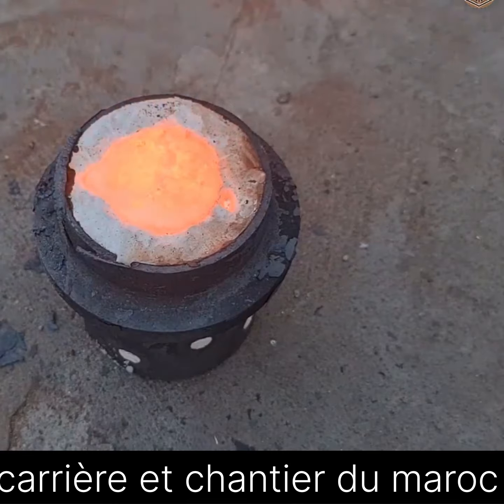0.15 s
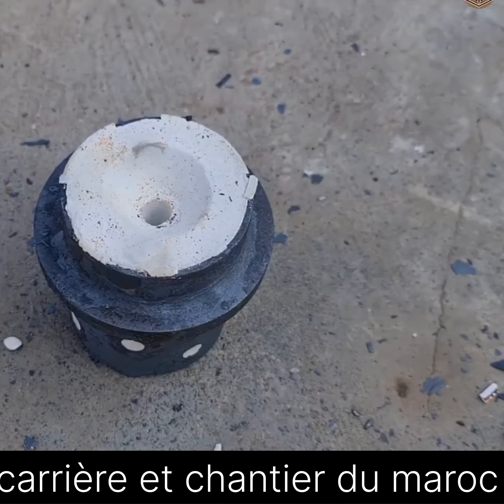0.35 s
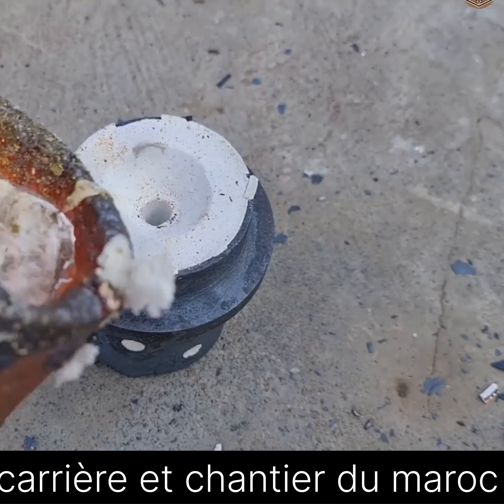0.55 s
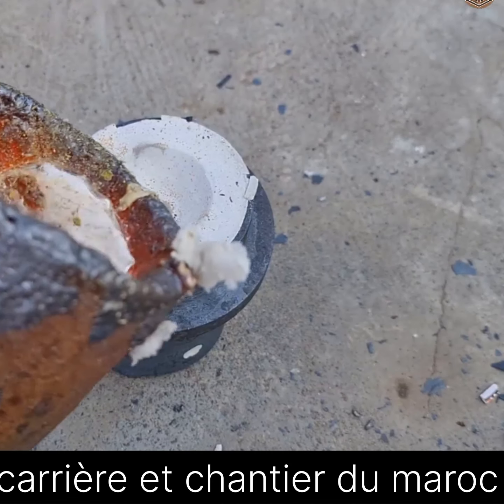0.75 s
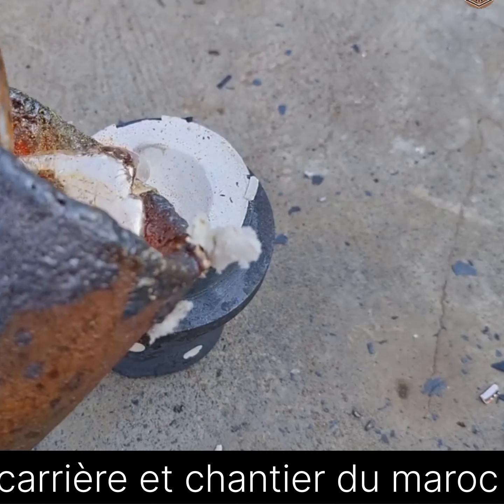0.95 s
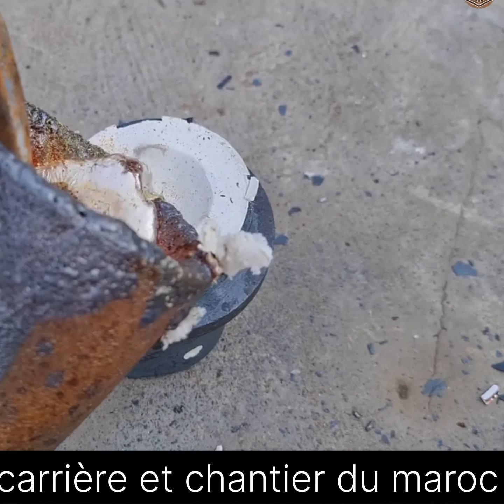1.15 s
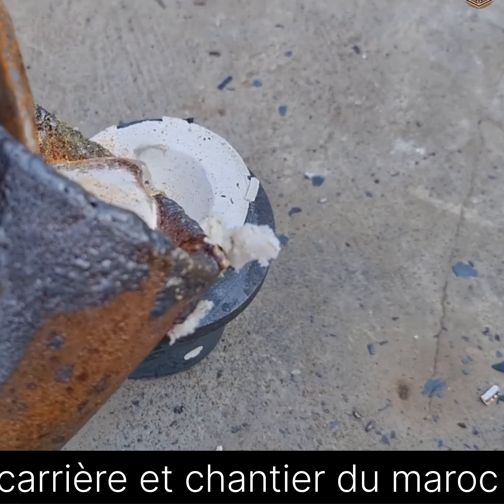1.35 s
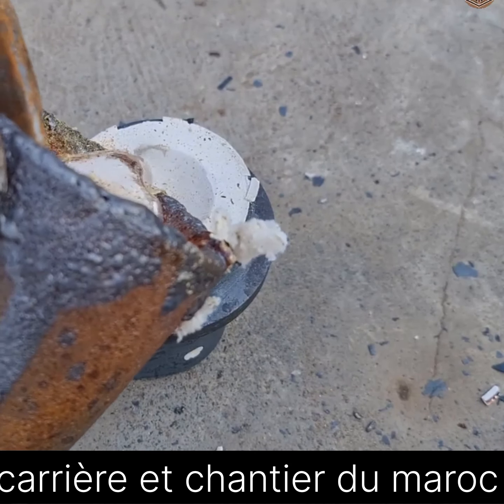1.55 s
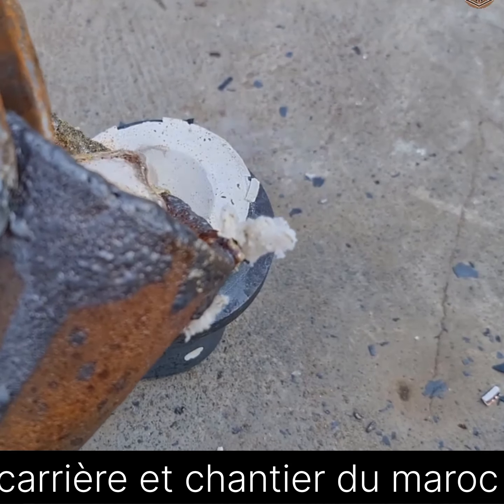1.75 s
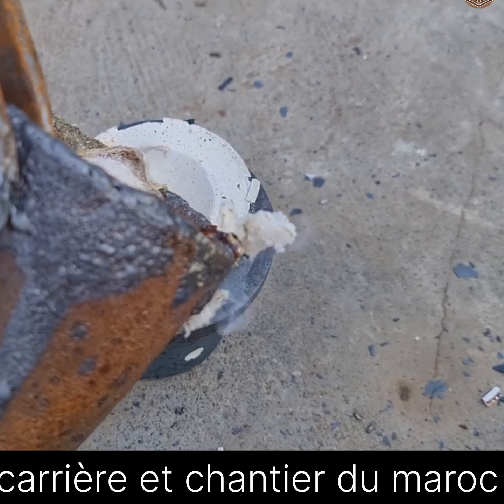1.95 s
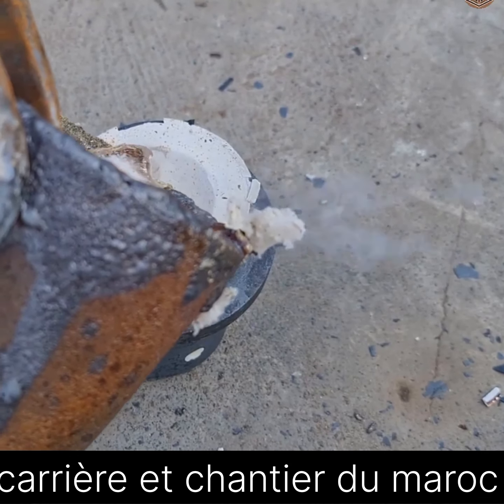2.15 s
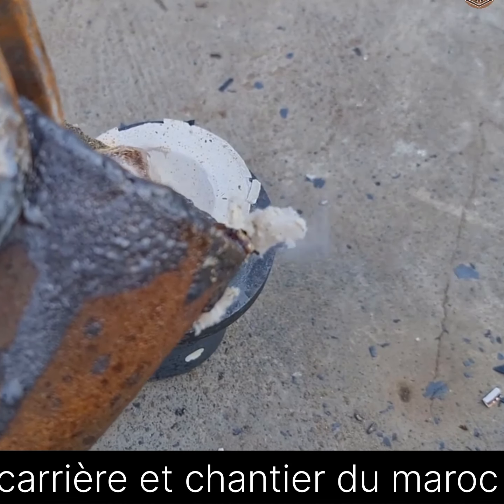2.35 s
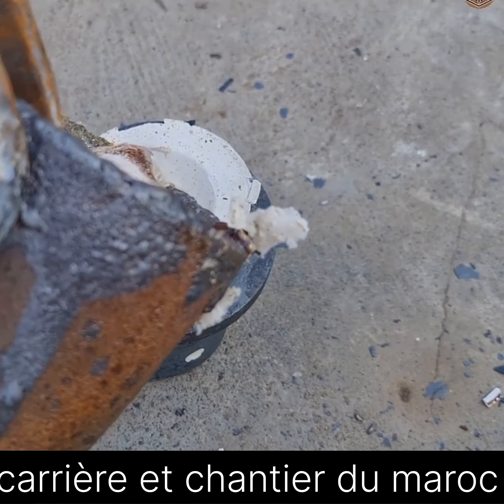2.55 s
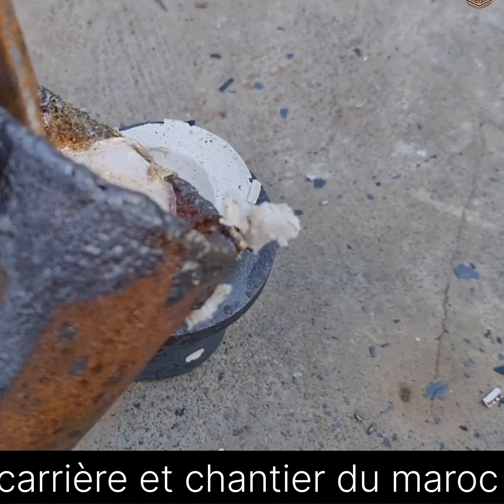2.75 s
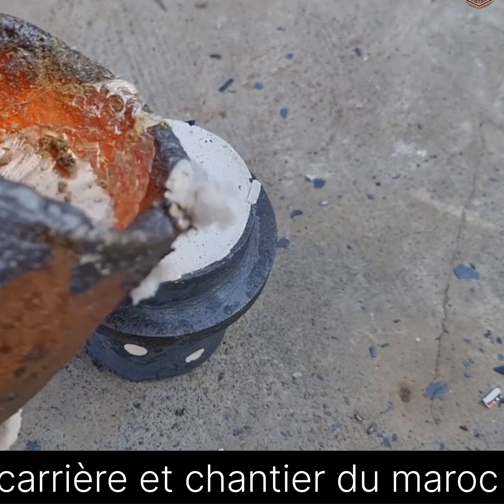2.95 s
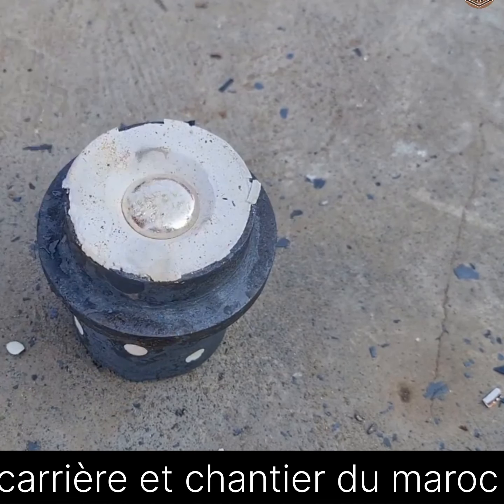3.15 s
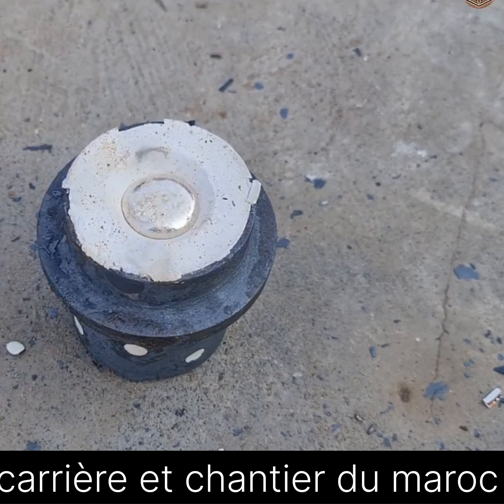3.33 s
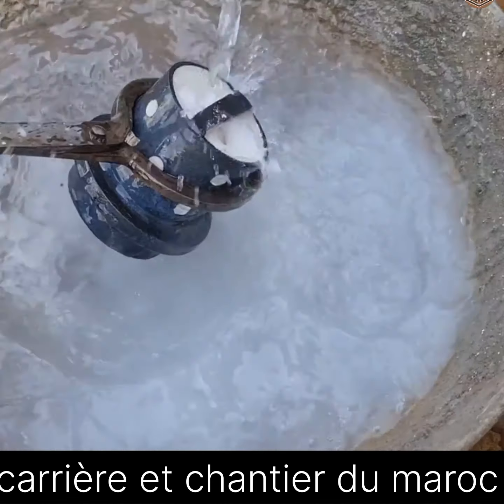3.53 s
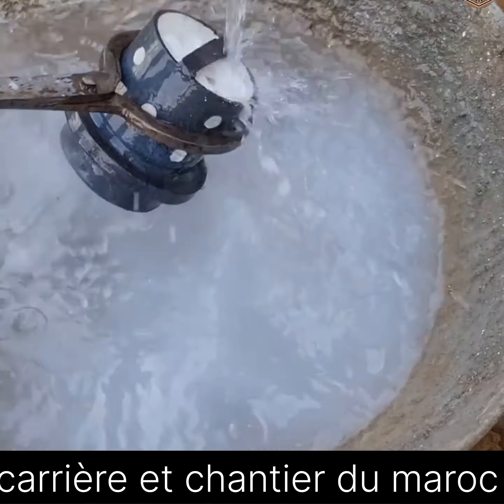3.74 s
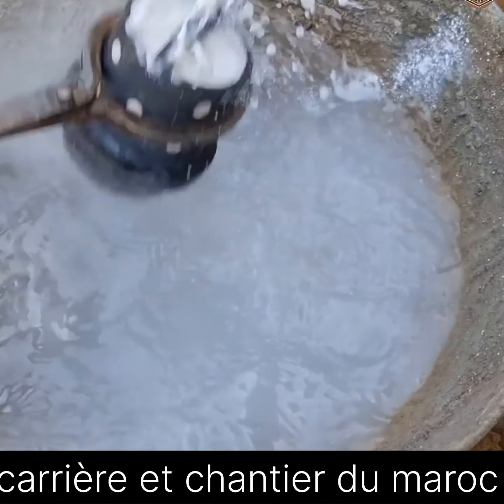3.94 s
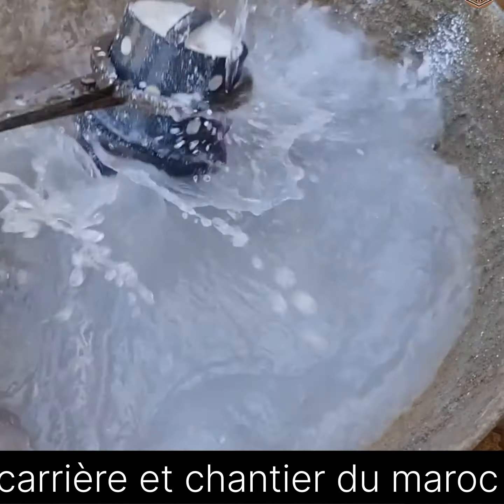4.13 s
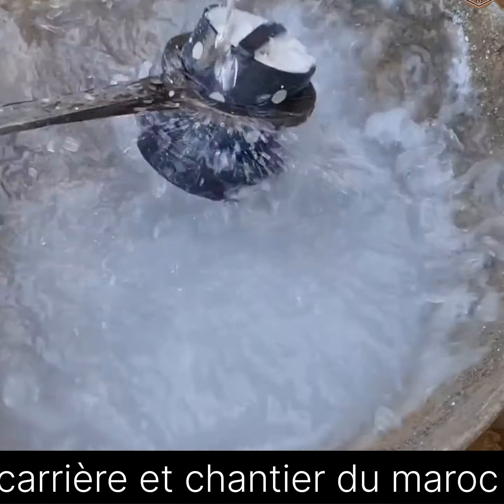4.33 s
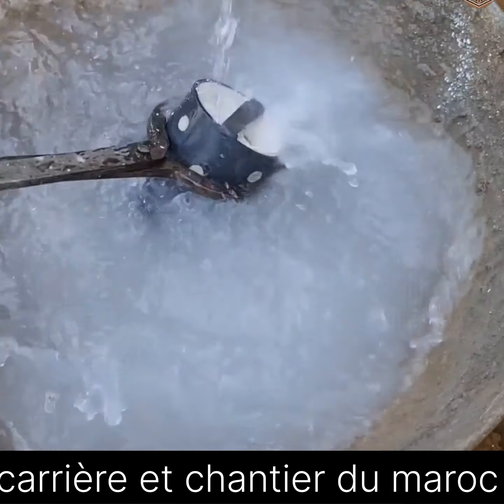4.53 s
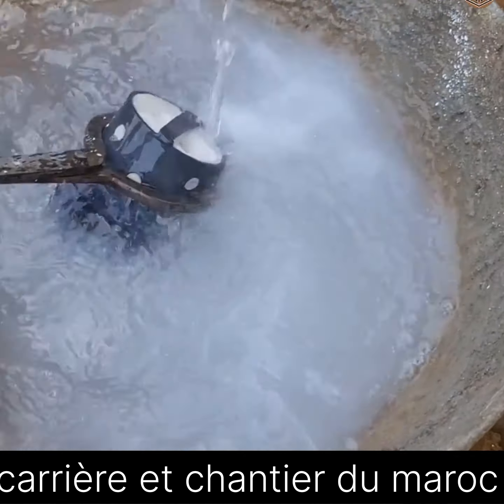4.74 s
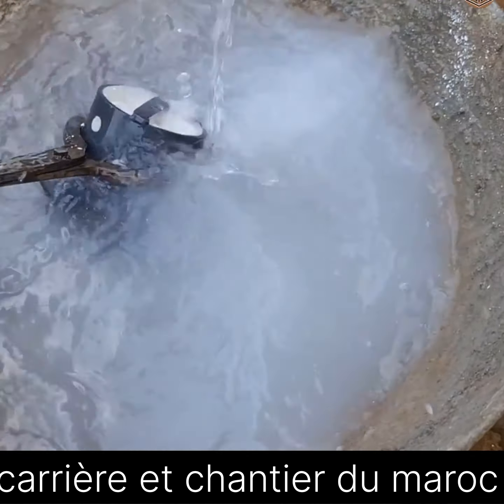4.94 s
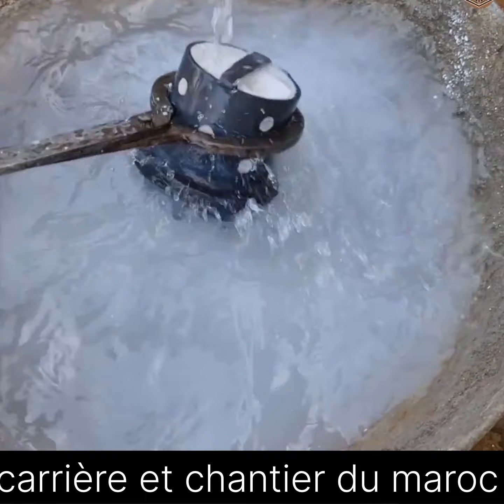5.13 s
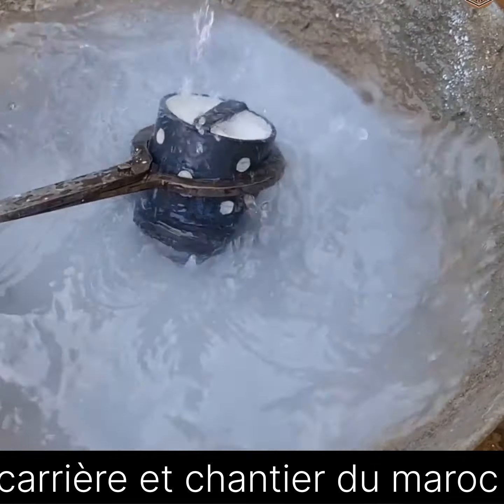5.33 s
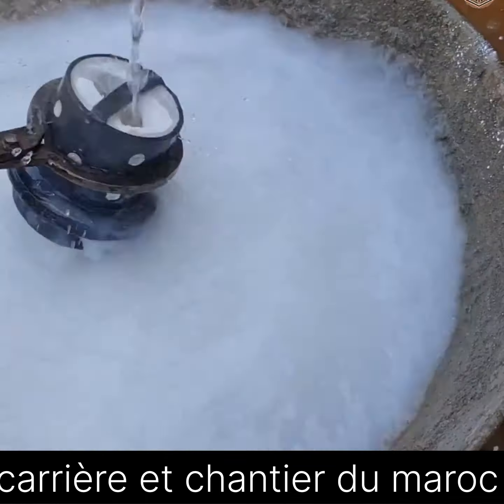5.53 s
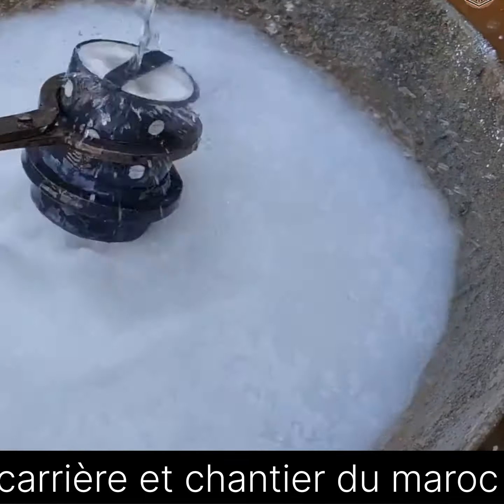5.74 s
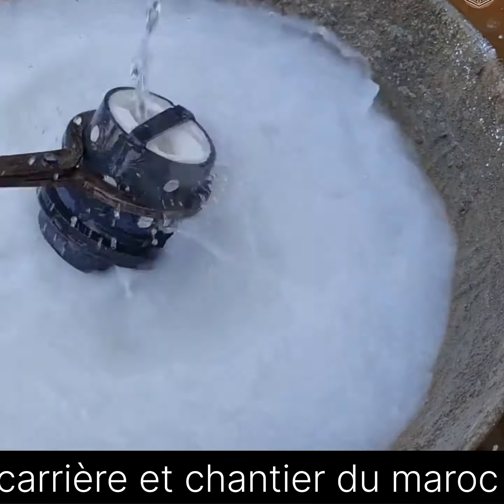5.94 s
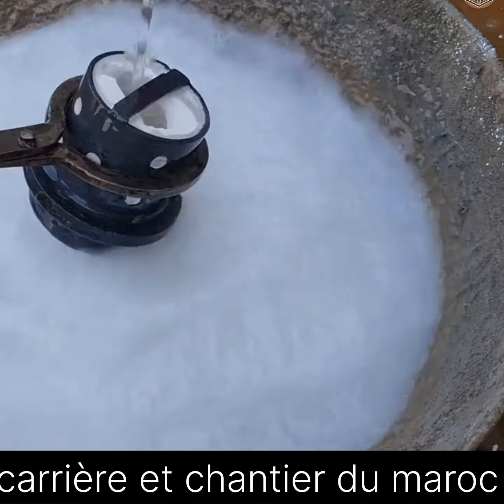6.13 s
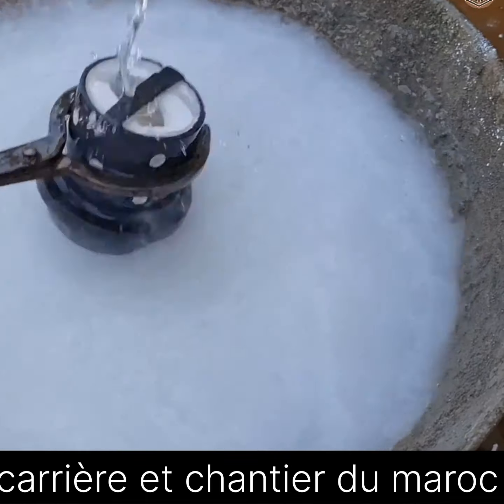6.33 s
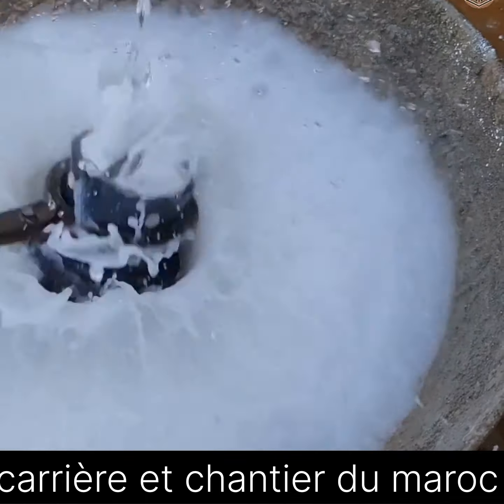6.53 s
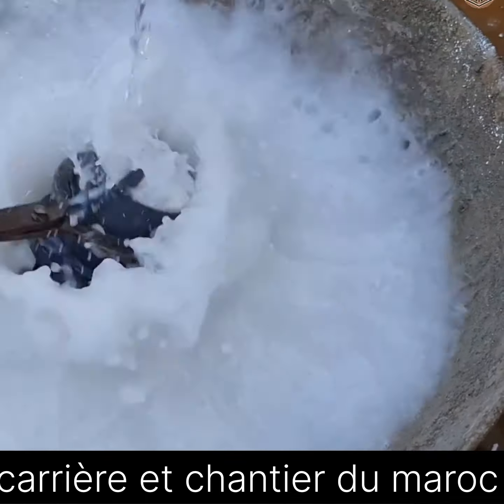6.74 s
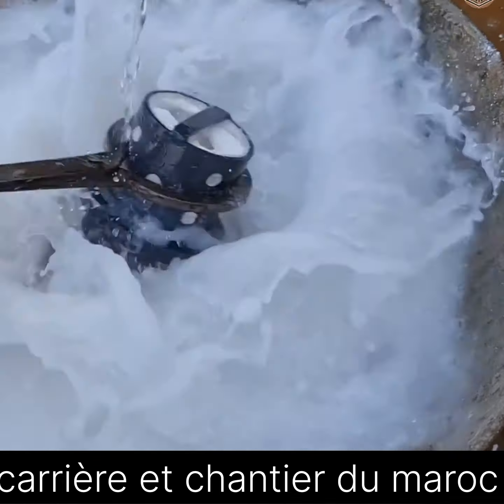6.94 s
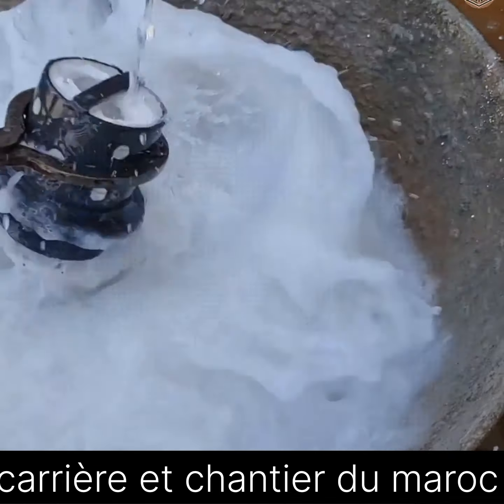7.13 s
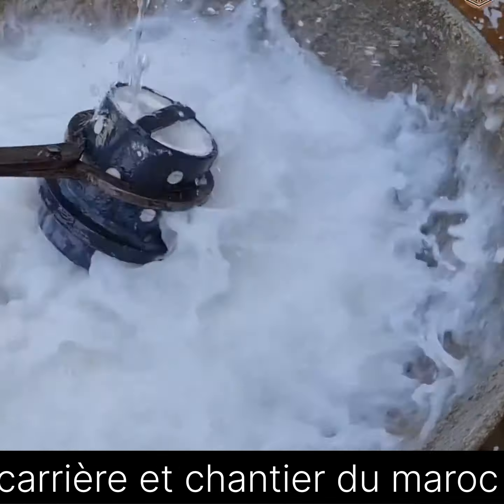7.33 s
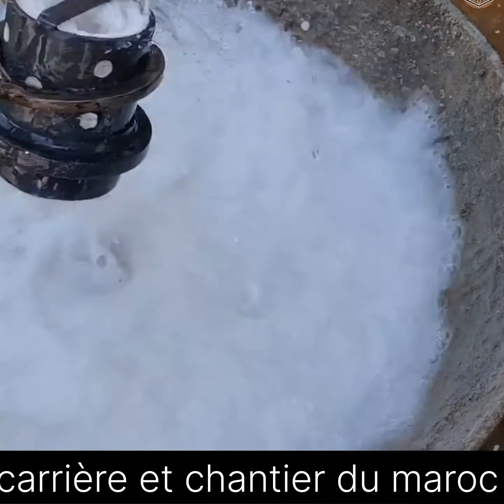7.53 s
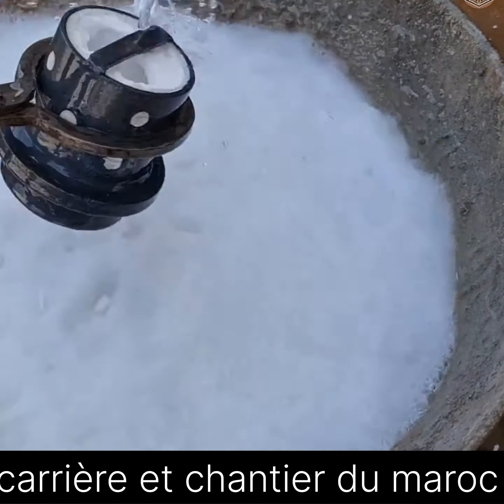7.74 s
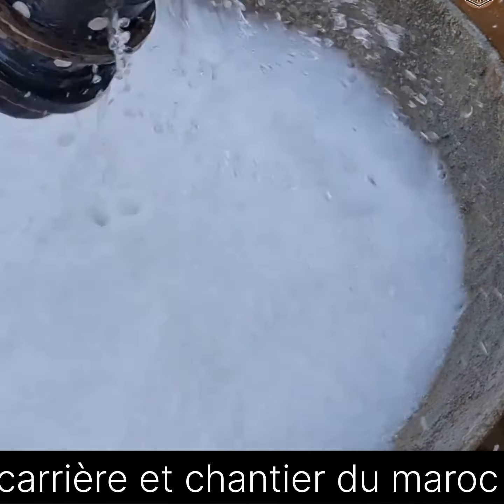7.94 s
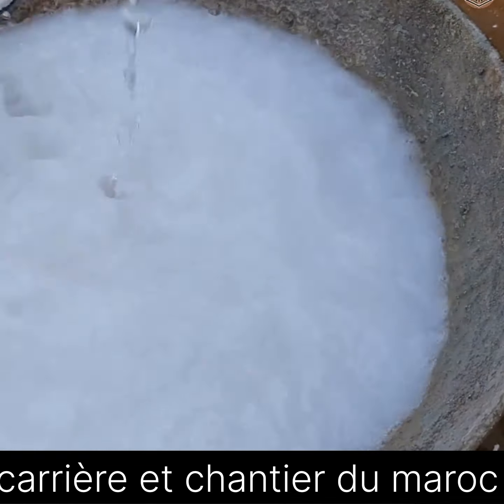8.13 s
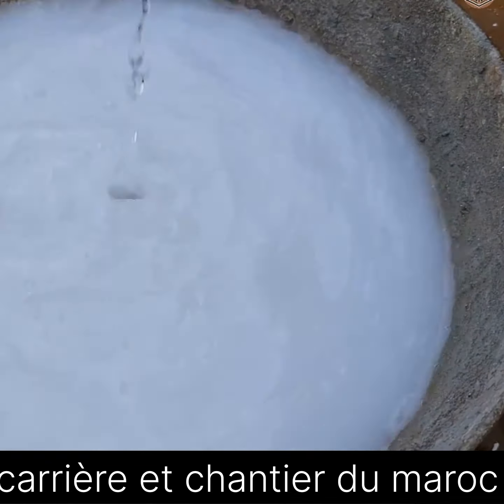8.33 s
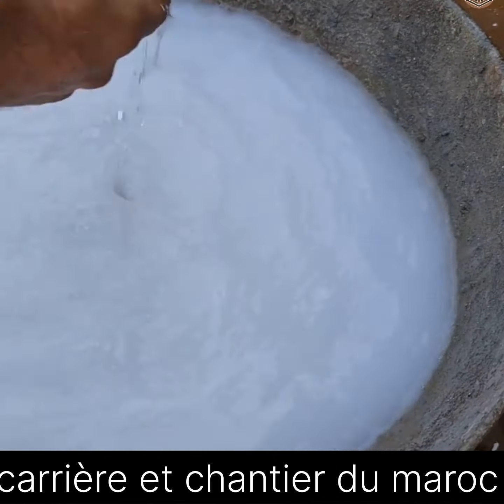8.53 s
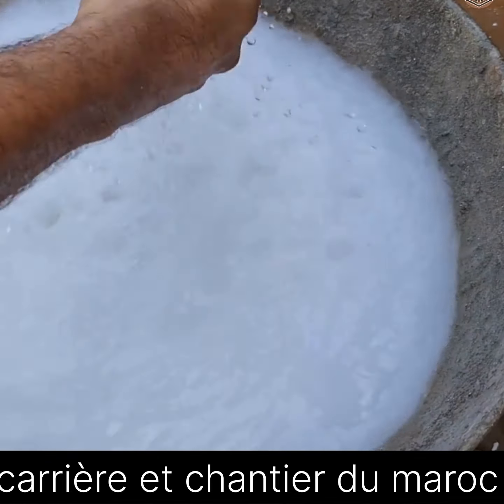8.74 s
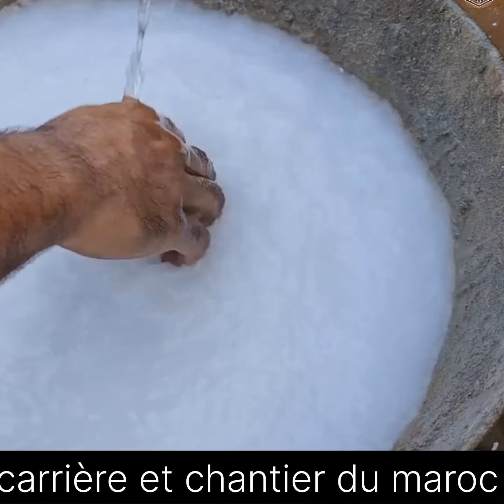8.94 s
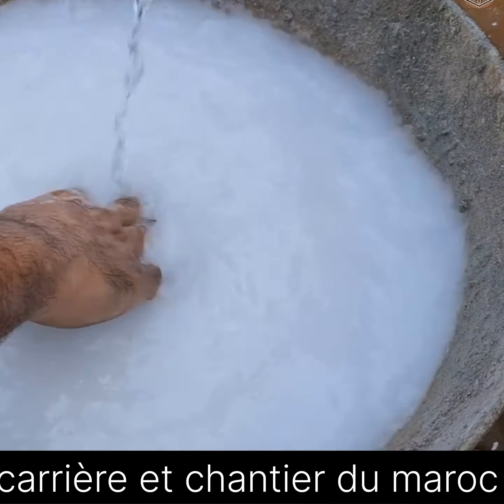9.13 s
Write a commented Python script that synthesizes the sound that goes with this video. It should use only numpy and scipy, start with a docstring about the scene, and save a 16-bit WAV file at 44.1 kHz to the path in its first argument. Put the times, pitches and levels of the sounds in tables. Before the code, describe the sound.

Low outdoor rumble and small drags on concrete give way to fierce steam hiss, hollow watery thumps, bubbling and a final hand splash.

```python
"""A quiet yard: low rumble, a wavering hum, a brief burner, far sparrows, and ticks and drags on concrete among them.
A hot flask is dunked in a tub: steam sizzles and spits, vapour pockets collapse with a thump that rings
the tub, and the water churns and gurgles. Hiss, roar and scuffs are shaped patchy noise; bubbles and crackle
are swarms of damped sines; hum and chirps are gliding sines; thumps are a falling push plus tub modes.
"""
import sys
import numpy as np
from scipy import signal
from scipy.fft import rfft, irfft, next_fast_len
from scipy.io import wavfile
from scipy.ndimage import uniform_filter1d, map_coordinates

SR = 44100
rng = np.random.default_rng(int(sys.argv[2]) if len(sys.argv) > 2 else 0)


def dump_mix(stems):
    """Bounce the given channels to the path in sys.argv[1] as a 16-bit WAV at rate SR."""
    frames = np.atleast_2d(stems).T  # one column per channel
    limited = np.clip(frames, -1, 1)  # hard clip at full scale
    pcm = np.round(limited * 32767).astype(np.int16)
    wavfile.write(sys.argv[1], SR, pcm)


N = 404838
T = np.arange(N) / SR

# All levels are settings ahead of each layer's own flutter, shaping and mix.
# Yard rumble over time: t/s, level/dB
RUMBLE_LEVEL = [(0, -50.5), (.6, -52), (1.3, -49), (2.3, -54), (3.5, -54)]
# Rumble colour: f/Hz, density/dB
RUMBLE_COLOUR = [(20, -29), (55, -7), (90, -9), (124, -6), (134, -5.5), (146, -10), (400, -19), (700, -47),
                 (1300, -120)]
# Thin roar colour: f/Hz, density/dB
ROAR_COLOUR = [(300, -13.5), (500, -13.5), (1660, -23), (6000, -31.5), (9000, -40.5), (15500, -61)]
# Burner noise colour: f/Hz, density/dB
BURNER_COLOUR = [(450, -9), (650, 6), (980, -1), (1150, -53)]
# Whistling modes of the burner: f/Hz, level/dB
BURNER_WHISTLES = [(635.2, -68), (721.4, -63), (855.9, -59), (979.8, -63)]
# Far motor hum over time: t/s, level/dB
HUM_LEVEL = [(0, -77), (.38, -46), (.6, -66), (.82, -45.5), (1.0, -60), (1.55, -43.5), (2.1, -56.5)]
HUM_HZ = 133.8
# Sparrow calls: t/s, length/s, from f/Hz, to f/Hz, level/dB
CHIRPS = [(0.768, 0.1, 3820, 3760, -54.5), (1.376, 0.059, 3620, 5900, -53), (1.481, 0.061, 5820, 3880, -52),
          (1.578, 0.028, 3440, 4680, -49.5), (1.726, 0.055, 5280, 3600, -54),
          (1.86, 0.27, 3336, 3280, -59.5), (2.011, 0.054, 5920, 4180, -50.5),
          (2.099, 0.035, 3280, 4510, -49.5)]
HOARSE_HZ, BROKEN_DB = 110, 4  # scatter of pitch and of level within a call

# Drags on concrete: t/s, length/s, level/dB, lateness of the peak (under 1 is early)
SCUFFS = [(0.223, 0.098, -28, 0.73), (2.607, 0.13, -53, 0.75), (2.697, 0.17, -47.5, 1.07),
          (2.805, 0.26, -38.5, 1.25), (3.18, 0.1, -38, 1.15)]
# Grit colour: f/Hz, density/dB
GRIT_COLOUR = [(410, -18), (700, -19.5), (1500, -7.5), (2800, -4.5), (5000, -3), (8120, -10.5),
               (15800, -24.5)]
SCUFF_PEAKED, SETTLE_AT = 1.56, 0.94  # power of the half-sine swell; share of a drag after which grit settles

# Dry ticks: t/s, level/dB, treble against body/dB, left over right/dB
TICKS = [(0.504, -42.5, 18, -3), (0.7601, -28.5, 9, -24.5), (2.2823, -24, -16, -2), (2.554, -31, -29, -5),
         (2.677, -31.5, -10, 8), (3.5514, -25.5, 5.5, -8), (4.873, -9.5, -8, -6), (5.329, -2.5, -28, -1),
         (7.676, -23, -24, 5), (8.116, -23, 3, -5), (8.2297, -22, -8, -4), (9.024, -17.5, -8.5, 3),
         (9.056, -22.5, 3, -2)]

# Stirring of the water: t/s, boil level/dB, gurgle level/dB
CHURN = [(3.59, -44, -52), (3.95, -64, -49), (4.1, -48, -43.5), (4.45, -41, -40), (5.45, -40, -38),
         (5.8, -42.5, -42.5), (6.2, -35.5, -49), (6.5, -48.5, -48.5), (6.9, -54, -39.5), (7.6, -51, -47.5),
         (7.8, -55.5, -66), (8.0, -37, -60), (8.4, -50.5, -44), (8.8, -69, -58.5), (9.17, -58, -54)]
# Low boil colour: f/Hz, density/dB
BOIL_COLOUR = [(30, -26), (60, -7.5), (100, -4), (170, -9), (350, -46)]
# Colour of the flask's mouth: f/Hz, density/dB
MOUTH_COLOUR = [(300, -33), (700, -3.5), (1050, -0.5), (1400, -7.5), (2200, -12), (5000, -28.5)]
# Bursts of bubbles in the flask's mouth: t/s, level/dB
GULPS = [(4.1, -11), (4.368, -6), (5.862, -23), (5.9, -18), (6.002, -18), (6.03, -24), (6.402, -4),
         (6.417, -5), (6.487, -10), (6.676, -14), (6.973, -15), (7.235, -10), (7.65, -17)]
# Big slow bubbles: t/s, level/dB
GLUGS = [(4.964, -28), (5.084, -24), (5.175, -19), (5.457, -24), (5.656, -17.5), (5.923, -23.5)]
# Single large bubbles: t/s, level/dB, f/Hz
DRIPS = [(4.794, -24.5, 214), (5.672, -7.5, 1068), (5.712, -26, 1010), (6.927, -22, 1210),
         (7.108, -18, 1700), (7.36, -25, 1013), (7.408, -26, 910), (7.784, -31, 1660), (7.929, -36.5, 1820),
         (8.156, -26, 2450), (8.269, -26, 2350), (9.024, -27, 2370)]
SLOSH_DB = -2  # sloshing over the gurgle; both follow the stirring

# Collapsing vapour pockets: t/s, push level/dB, burst in the flask's mouth level/dB
THUMPS = [(4.028, -4.5, -10.5), (4.288, -12, -12), (4.503, -8.5, -19.5), (5.265, -12.5, -19),
          (6.425, -2.5, -15.5), (6.603, -5.5, -9.5), (6.798, -5.5, -12), (6.96, -8, -7), (7.133, -5, -12),
          (7.567, -14.5, -12), (8.608, -20.5, -29.5)]
# Ringing modes of the tub: f/Hz, t60/s
TUB_MODES = [(190, 0.11), (220, 0.15), (310, 0.096), (465, 0.059)]
RING_DB, RING_GROWS = -15.5, 0.8  # ring for a 0 dB push; dB of ring per dB of push

# Steam over time: t/s, sizzle level/dB, spray level/dB
STEAM_LEVELS = [(3.59, -38, -41), (3.597, -24, -32), (3.74, -25.5, -31.5), (3.78, -31.5, -42),
                (3.92, -38, -38.5), (3.96, -26, -30.5), (4.44, -29, -37.5), (5.015, -27, -40.5),
                (5.045, -34, -43), (5.09, -30, -42), (5.5, -30, -38.5), (5.8, -42.5, -41),
                (6.35, -35.5, -39), (6.55, -33, -42.5), (7.4, -35, -41), (7.7, -41.5, -52), (7.8, -64, -54),
                (8.08, -52, -52.5), (8.14, -37, -44.5), (8.26, -38, -44.5), (8.33, -43.5, -50),
                (8.78, -44.5, -38.5), (8.88, -53, -54.5), (9.17, -41, -42.5)]
# Sizzle colour: f/Hz, density/dB
SIZZLE_COLOUR = [(800, -48), (1500, -9.5), (2300, -5.5), (3800, -6), (5700, -10.5), (9000, -23),
                 (15000, -60)]
# Fine spray colour: f/Hz, density/dB
SPRAY_COLOUR = [(2400, -11), (4000, -7), (6400, -1.5), (9600, -2), (15800, -15.5)]
# Resonances of the flask's wall: f/Hz, width/Hz, level/dB
WALL_MODES = [(2130, 930, -4.5), (3390, 107, 4.5), (3750, 250, 4.5), (5680, 540, 3.5)]
# Steam spurts: t/s, level/dB
SPURTS = [(3.866, -16.5), (4.106, -26), (4.289, -23), (4.404, -27), (4.536, -21.5), (4.562, -28),
          (4.634, -17.5), (4.684, -23), (4.745, -15.5), (4.784, -29), (4.837, -21.5), (4.948, -22.5),
          (5.142, -21), (5.196, -20), (5.269, -20), (5.453, -19), (5.976, -24.5), (7.2274, -21)]
SPURT_T60_S, SPURT_SPRAY_DB, CRACK_DB = 0.053, -14, -6.5  # spray and crack against the spurt
# Thrown water: t/s, level/dB
SPLASHES = [(5.058, -13.5), (6.386, -9.5), (6.48, -16.5), (6.562, -14.5), (7.222, -21), (8.375, -18.5),
            (8.593, -1), (8.673, -7)]
# Thrown water colour: f/Hz, density/dB
DROPLET_COLOUR = [(2000, -12), (5000, -5.5), (9000, 2.5), (15800, -11.5)]
SPLASH_T60_S, SPLASH_BODY_DB, SPLASH_SLOSH_DB = 0.1, -22, -18.5  # sizzle and slosh against the splash

# Default stereo image of noise: f/Hz, left-right likeness (1 is mono)
ALIKE = [(950, 0.32), (3800, 0.086)]
DIP_HZ, DIP_WIDTH_HZ, DIP_DB = 1364, 244, -3.5  # a hollow in the microphone's colour
TOP_HZ = 15900


def amp(db):
    """Turn dB into gain."""
    return 10 ** (np.asarray(db) / 20)


def unit(x):
    """Scale to an rms of 1."""
    return x / np.sqrt(np.mean(x ** 2) + 1e-20)


def along(points, hz):
    """Read (f/Hz, value) points on a log frequency axis."""
    f, v = np.transpose(points)
    return np.interp(np.log(hz + 1), np.log(f + 1), v)


def gains(rows):
    """Draw one gain curve per dB column, all but silent before the first row."""
    s, *columns = np.transpose(rows)
    return [amp(np.interp(T, s, column, -150)) for column in columns]


def decays(events, attack, soft=1):
    """Rise at each (t/s, level/dB, t60/s) event and die away; soft bends the start."""
    out, t = np.zeros(N + SR), np.arange(SR // 3) / SR
    for s, db, t60 in events:
        fall = amp(db - 60 * t / max(t60, .01))
        out[round(s * SR):][:len(t)] += fall * (1 - np.exp(-t / attack)) ** soft
    return out[:N]


def wobble(rate):
    """Draw a smooth random curve with rate knots a second."""
    return map_coordinates(rng.standard_normal(int(N * rate / SR) + 4), [T * rate])


def tone(hz):
    """A sine that follows a pitch curve."""
    return np.sin(2 * np.pi * np.cumsum(hz) / SR)


def filtered(x, response):
    """Multiply the spectrum of x by a response of frequency."""
    m = next_fast_len(N + 8192)
    return irfft(rfft(x, m) * response(np.fft.rfftfreq(m, 1 / SR)), m)[..., :N]


def rush(spectrum, patchy_db, spiky_db=0., alike=ALIKE):
    """Stereo noise of rms 1 with time-frequency patches of random gain and millisecond spikes."""
    z = signal.stft(rng.standard_normal((2, N)), nperseg=512)[2]
    field = rng.standard_normal(z.shape[1:])
    patches = unit(uniform_filter1d(uniform_filter1d(field, 6, 0), 8, 1))
    pair = signal.istft(z * amp(patchy_db * patches), nperseg=512)[1][:, :N]
    pair = pair * amp(spiky_db * wobble(400))

    def colour_and_width(hz):
        turn = np.arccos(np.clip(along(alike, hz), -1, 1)) / 2
        return amp(along(spectrum, hz)) * [np.cos(turn), np.sin(turn)]

    mid, side = filtered(pair, colour_and_width)
    return unit(np.array([mid + side, mid - side]))


def pings(s, hz, cycles, size, pan_db, rise, length):
    """Damped sines, placed in stereo; a positive rise lifts the pitch as they die."""
    t = np.arange(length) / SR
    u = hz[:, None] * t / cycles  # time in units of the decay
    envelope = np.exp(-u) * (1 - np.exp(-6 * u))
    wave = size[:, None] * np.sin(2 * np.pi * cycles * u * (1 + rise * u)) * envelope
    at = (np.round(s * SR).astype(int)[:, None] + np.arange(length)).ravel()
    placed = [(wave * amp(side * pan_db / 2)[:, None]).ravel() for side in (1, -1)]
    return np.array([np.bincount(at, channel, N + length)[:N] for channel in placed])


def swarm(count, hz, spread, cycles, scatter_db, wide_db, rise, length):
    """Scatter pings at random moments, sizes, pitches and places, rms 1."""
    d = rng.standard_normal((count, 3))
    pitch = hz * np.exp(spread * d[:, 0])
    size = amp(scatter_db * np.clip(d[:, 2], -2, 2))
    pan_db = wide_db * np.tanh(d[:, 1])
    return unit(pings(rng.random(count) * T[-1], pitch, cycles, size, pan_db, rise, length))


def rumble():
    """Low, nearly mono noise that swells gently, under a thin wide roar."""
    low = rush(RUMBLE_COLOUR, patchy_db=-1.0, alike=[(50, 0.97), (200, 1.0)])
    roar = rush(ROAR_COLOUR, patchy_db=3.0, alike=[(500, 0.034)])
    return gains(RUMBLE_LEVEL)[0] * amp(0.35 * wobble(21)) * low + amp(-57.0) * roar


def burner():
    """A burner at the very start: fading turbulent noise with unsteady whistling modes."""
    noise = rush(BURNER_COLOUR, patchy_db=2.5, alike=[(500, 0.31)])
    fade = gains([(0, -52.5), (.2, -57.5), (.4, -73)])[0]
    whistles = sum(amp(db + 2.3 * wobble(20)) * tone(hz + 6 * wobble(25)) for hz, db in BURNER_WHISTLES)
    whistle_fade = gains([(0, 5.5), (.22, -1), (.36, -22)])[0] * (T < .36)
    return fade * noise + whistle_fade * whistles


def hum():
    """A far motor: one sine of drifting pitch and wavering level."""
    return gains(HUM_LEVEL)[0] * tone(HUM_HZ + 3 * wobble(4.3))


def sparrows():
    """Far chirps: hoarse gliding sines smeared by a tail of decaying noise."""
    birds = np.zeros((2, N))
    for s, length, from_hz, to_hz, db in CHIRPS:
        u = np.clip((T - s) / length, 0, 1)
        pitch = from_hz + (to_hz - from_hz) * u + HOARSE_HZ * wobble(150)
        level = amp(db + BROKEN_DB * np.tanh(wobble(180))) * np.sqrt(np.abs(np.sin(np.pi * u)))
        call = level * tone(pitch)
        echoes = rng.standard_normal((2, 6000)) * amp(-60 * T[:6000] / 0.38)  # walls smear each call
        echoes = echoes / np.linalg.norm(echoes[0])
        birds += 0.35 * call + signal.oaconvolve(call[None], echoes, axes=1)[:, :N]
    return birds


def scuffs():
    """Something drags over gritty concrete: noise, each drag one swell."""
    level = 0
    for s, length, db, late in SCUFFS:
        u = np.clip((T - s) / length, 0, 1)
        level = level + amp(db) * np.sin(np.pi * u ** late) ** SCUFF_PEAKED
    # loose grit settles
    level += decays([(s + SETTLE_AT * length, db - 18, .12) for s, length, db, _ in SCUFFS], attack=0.01)
    return level * rush(GRIT_COLOUR, patchy_db=1.5, spiky_db=1.0) * amp([[-1.2], [1.2]])


def spits():
    """Dry broadband ticks of grit, cooling metal and single droplets: short noise with a faint tail."""
    ticks = 0
    dull, bright = rush(SIZZLE_COLOUR, patchy_db=1.5), rush(SPRAY_COLOUR, patchy_db=1.0)
    for s, db, treble_db, pan_db in TICKS:
        shape = decays([(s, db, .012), (s, db - 33, .06)], attack=0.0025)
        ticks = ticks + shape * (dull + amp(treble_db) * bright) * amp([[pan_db / 2], [-pan_db / 2]])
    return ticks


def water():
    """Bubbles ring as damped sines over a low boil; thumps and gulps excite the flask's mouth."""
    boil, gurgle = gains(CHURN)
    splashed = decays([(s, db + SPLASH_SLOSH_DB, .15) for s, db in SPLASHES], attack=0.023)
    slosh = amp(SLOSH_DB) * gurgle + splashed
    boil = boil + decays([(s, db, .09) for s, db in GLUGS], attack=0.00079)

    boil_noise = rush(BOIL_COLOUR, patchy_db=-2.5, alike=[(60, 0.13), (150, 0.24)])
    low = unit(amp(2.1 * wobble(22)) * boil_noise) * amp([[-2.5], [2.5]])  # lumpy
    mid = swarm(count=1500, hz=289.7, spread=0.45, cycles=1.83, scatter_db=7.5, wide_db=9.5,
                rise=0.056, length=2000)
    high = swarm(count=2500, hz=993, spread=0.26, cycles=3.05, scatter_db=-0.5, wide_db=7.5,
                 rise=0.048, length=900)
    froth = swarm(count=1100, hz=1040, spread=0.1313, cycles=6.4, scatter_db=3.5, wide_db=3.5,
                  rise=0.023, length=1500)
    mouth = rush(MOUTH_COLOUR, patchy_db=1.0, spiky_db=3.0, alike=[(1000, 0.43)])
    gurgling = unit(amp(3.0 * wobble(25)) * (high + 0.97 * froth + 0.62 * mouth))

    s, db, hz = np.transpose(DRIPS)
    drips = pings(s, hz, cycles=6.0, size=amp(db), pan_db=0 * s, rise=0.018, length=5000)
    bursts = decays([(s, db, .08) for s, db in GULPS], attack=0.02)
    bursts += decays([(s, db, .07) for s, _, db in THUMPS], attack=0.0032)
    return boil * low + slosh * mid + gurgle * gurgling + bursts * (0.63 * mouth + 0.56 * froth) + drips


def thumps():
    """A vapour pocket implodes: suction, a hard push, then the tub rings out raggedly."""
    out, t = np.zeros((2, N + SR)), np.arange(SR // 6) / SR
    for s, db, _ in THUMPS:
        scatter = np.tanh(rng.standard_normal((len(TUB_MODES), 2)))
        falling = -np.sin(2 * np.pi * (520 * t - 9000 * t * t))
        push = falling * (t / 0.0022) * np.exp(1 - t / 0.0012)
        ring = 0
        for (hz, t60), (louder, sharper) in zip(TUB_MODES, scatter):
            mode = np.sin(2 * np.pi * hz * (1 + 0.087 * sharper) * t)
            ring = ring + amp(2 * louder - 60 * t / t60) * mode
        shared = 5.8 * np.tanh(wobble(181)[:len(t)])
        per_side = 4.0 * np.tanh([wobble(174)[:len(t)], wobble(148)[:len(t)]])
        ring = ring * amp(shared + per_side) * (1 - np.exp(-t / 0.00088))
        start = round((s + .002) * SR)
        out[:, start:][:, :len(t)] += amp(db) * push + amp(RING_DB + RING_GROWS * db) * ring
    # the thumps carry no deep bass
    return filtered(out[:, :N], lambda f: (1j * f / (90 + 1j * f)) ** 2)


def flask_wall(f):
    """Resonances of the flask's wall, summed with alternating sign."""
    total = 0
    for k, (centre, width, db) in enumerate(WALL_MODES):
        mode = 1j * f * width / (centre * centre - f * f + 1j * f * width)
        total = total + (-1) ** k * amp(db) * mode
    return total


def steam():
    """Water flashes on hot metal: hiss, tiny collapsing bubbles that ring the flask's wall, fine spray above."""
    sizzle, spray = gains(STEAM_LEVELS)
    flutter = amp(3.6 * np.tanh(wobble(30)) + 2.14 * np.tanh(wobble(110)))
    spurts = decays([(s, db, SPURT_T60_S) for s, db in SPURTS], attack=0.0015, soft=0.98)
    # each spurt opens with a crack
    cracks = decays([(s, db + CRACK_DB, .012) for s, db in SPURTS], attack=0.00016)
    splashes = decays([(s, db, SPLASH_T60_S) for s, db in SPLASHES], attack=0.015, soft=2.53)
    sizzle = flutter * sizzle + spurts + cracks + amp(SPLASH_BODY_DB) * splashes
    spray = flutter * spray + amp(SPURT_SPRAY_DB) * spurts

    heat = np.interp(T, [3.8, 4.6, 6.0], [1.8, .9, .3])  # the cooling flask crackles less
    crackle = swarm(count=5000, hz=3610, spread=0.19, cycles=0.91, scatter_db=4.0, wide_db=17.5,
                    rise=0, length=120)
    fizz = swarm(count=2200, hz=3200, spread=0.3, cycles=13.8, scatter_db=3.5, wide_db=12.5,
                 rise=0.0083, length=900)
    hiss = rush(SIZZLE_COLOUR, patchy_db=4.5, spiky_db=0.5)
    body = 1.085 * hiss + heat * unit(filtered(crackle, flask_wall)) + 0.69 * fizz
    body = body / np.sqrt(3.8 + heat ** 2)  # evens the level as the heat falls
    fine = rush(SPRAY_COLOUR, patchy_db=3.0, spiky_db=1.0)
    droplets = rush(DROPLET_COLOUR, patchy_db=6.5, spiky_db=1.5)
    return (sizzle * body + spray * fine + splashes * droplets) * amp([[-.8], [.8]])


def scene():
    """Mix the yard, the sounds on concrete and the tub."""
    yard = rumble() + burner() + hum() + sparrows()
    return yard + scuffs() + spits() + water() + thumps() + steam()


def record(dry):
    """The microphone has a hollow in the low treble and keeps nothing above its band limit."""
    def response(hz):
        hollow = amp(DIP_DB * np.exp(-((hz - DIP_HZ) / DIP_WIDTH_HZ) ** 2))
        return hollow * (hz < TOP_HZ)

    return filtered(dry, response)


dry = scene()
out = record(dry)
dump_mix(out)
```